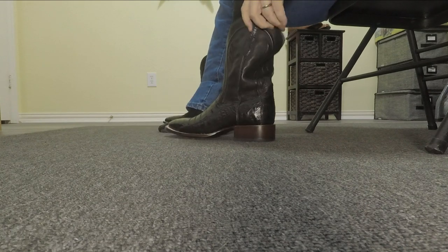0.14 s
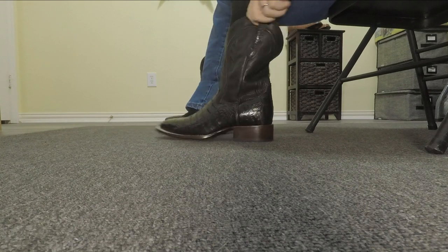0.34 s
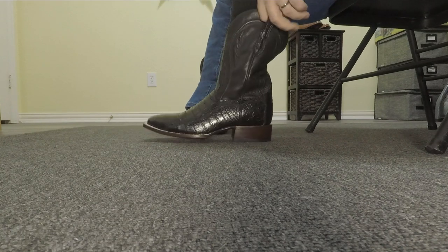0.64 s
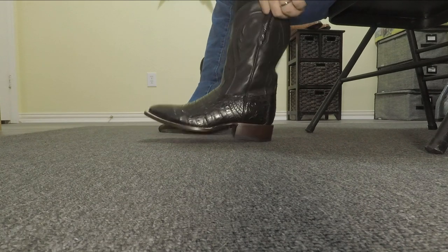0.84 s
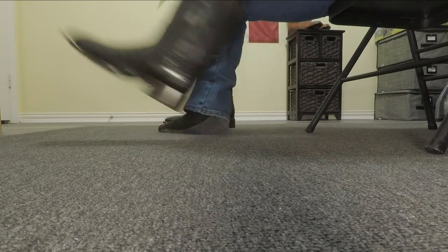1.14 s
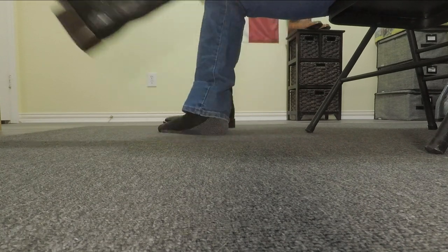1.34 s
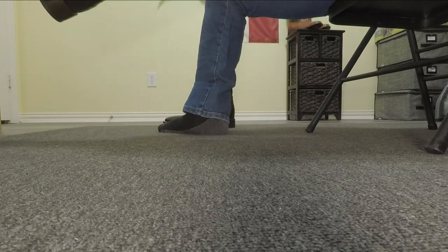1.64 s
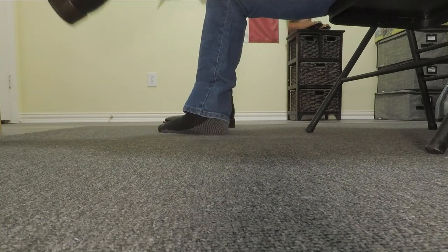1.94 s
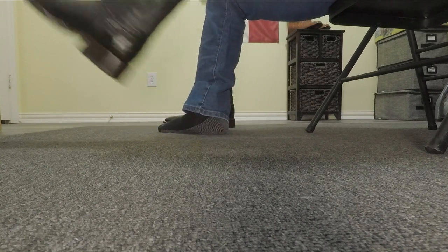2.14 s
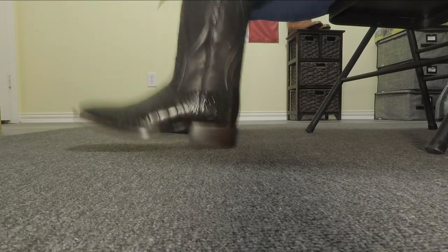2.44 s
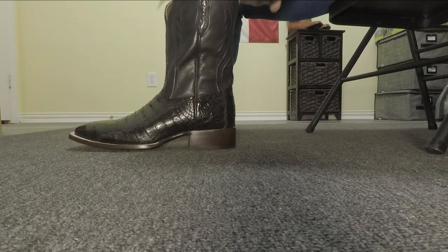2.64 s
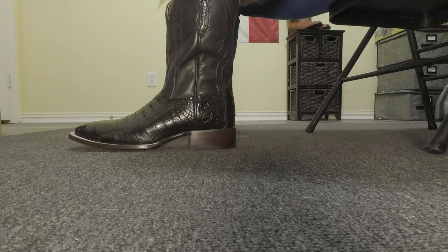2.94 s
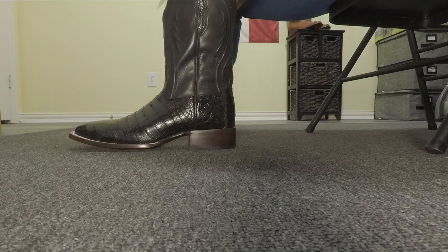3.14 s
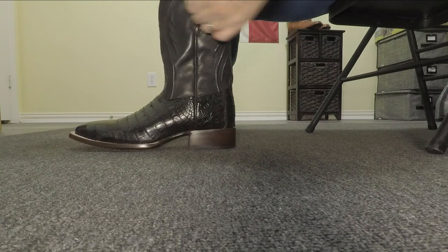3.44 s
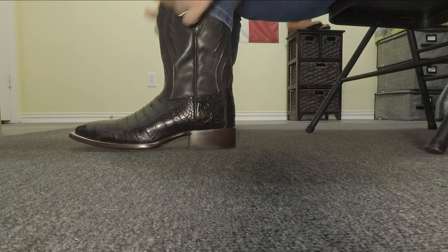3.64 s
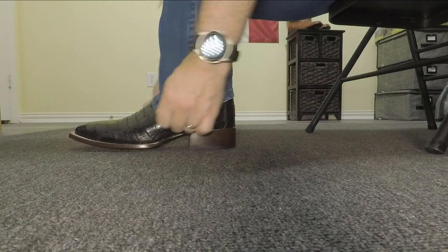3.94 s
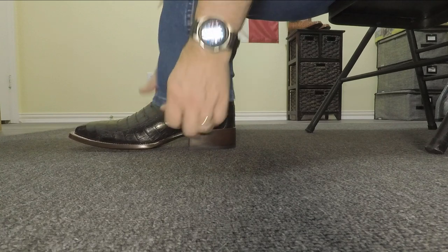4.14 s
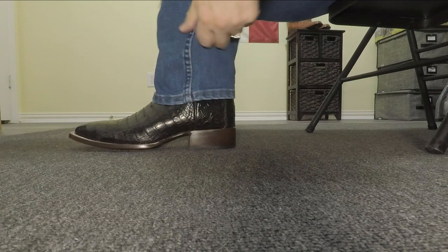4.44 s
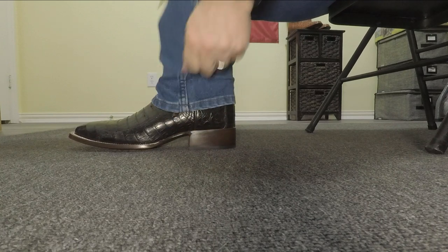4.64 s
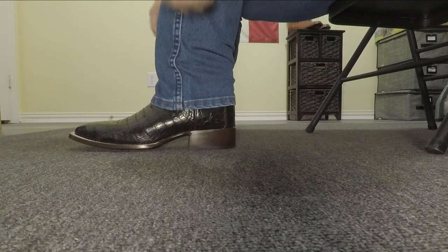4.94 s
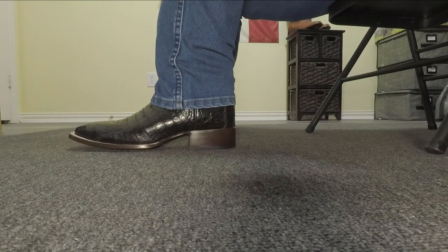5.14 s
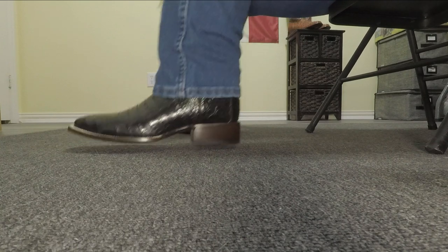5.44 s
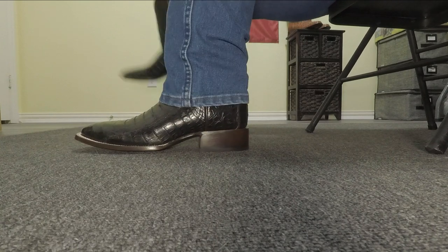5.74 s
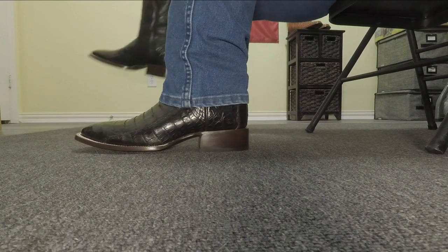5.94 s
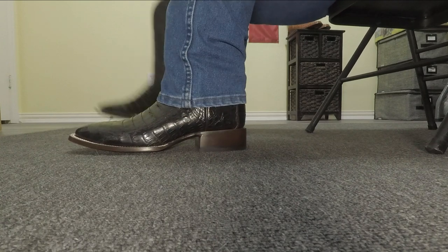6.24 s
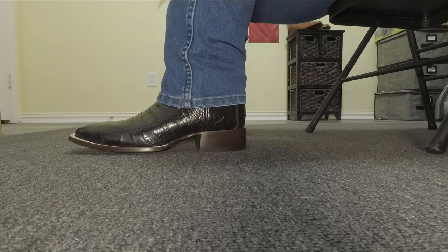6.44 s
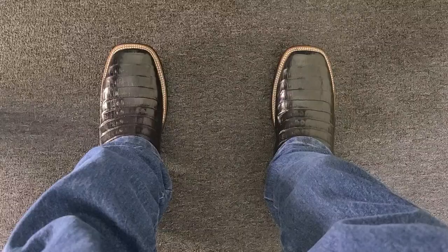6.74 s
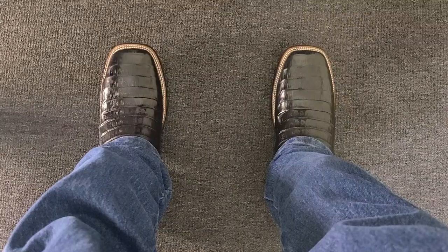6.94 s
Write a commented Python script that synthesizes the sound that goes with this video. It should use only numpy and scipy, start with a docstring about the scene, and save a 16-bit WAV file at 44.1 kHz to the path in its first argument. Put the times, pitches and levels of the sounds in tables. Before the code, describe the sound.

Low rubbing of leather and cloth comes in short uneven pulls, with folds puffing and an occasional dry tick. A boot stamps on carpet with clicky knocks and a short boxy room answer. Busy tugging and patting of jeans follows, then a pause, a sharp stamp and a duller set-down. A nearby stereo microphone on the floor hears it all before an abrupt stop.

```python
"""In a small quiet room, a microphone with two unlike ports stands on the floor by a seated person.
From the start a boot is pulled on: stick-slip noise rubs, folds of leather and denim puff, taut leather ticks.
At 2.5 s it stamps on the carpet, a click, knock, thud and ring; then the jeans are tugged down over the shaft.
At 5.6 s it stamps again and at 6.4 s the second boot is set down, each blow answered by the walls.
At 6.8 s all this stops abruptly and only a faint hush, there throughout, is left."""
import sys
import numpy as np
from scipy import signal
from scipy.fft import rfft, irfft, next_fast_len
from scipy.io import wavfile
from scipy.ndimage import map_coordinates

SR = 44100
rng = np.random.default_rng(int(sys.argv[2]) if len(sys.argv) > 2 else 0)


def put_to_file(sound):
    """Save the sound as 16-bit audio at rate SR, in the file named by the first command-line argument."""
    columns = np.atleast_2d(sound).T  # one column per channel
    safe = np.clip(columns, -1, 1)
    whole_steps = np.round(safe * 32767)
    wavfile.write(sys.argv[1], SR, whole_steps.astype(np.int16))


N = 313110  # samples

# Levels in the tables are those at the source, before trims, room and microphone.
# faint room noise: (frequency [Hz], relative density [dB])
AIR_SPECTRUM = [(60, -22.5), (110, -33.5), (160, 3.5), (260, 6), (420, -6), (620, -5.5), (930, -8.5),
                (1800, -17.5), (4400, -29.5), (7500, -23.5), (10000, -22.5), (15000, -41)]
# low rumble: (frequency [Hz], relative density [dB])
RUMBLE_SPECTRUM = [(20, -29), (42, -7), (57, 17), (72, -6.5), (100, 7.5), (160, -38)]
# hush that outlasts the rest: (frequency [Hz], relative density [dB])
HUSH_SPECTRUM = [(100, -4.5), (250, -6), (450, -10), (900, -22), (8000, -24)]
# pulls and tugs on boot and jeans: (start [s], hold [s], sliding [dB], leather flexing [dB], denim hiss [dB])
STROKES = [(0.0, 0.051, -34.5, -35, -56), (0.16, 0.12, -37.5, -39.5, -58.5), (0.383, 0.098, -36, -37, -58),
           (0.705, 0.014, -37.5, -39.5, -65), (0.816, 0.2, -35.5, -36.5, -56.5),
           (1.037, 0.29, -37.5, -55, -55), (1.411, 0.066, -38.5, -40, -62), (1.658, 0.049, -36, -38, -56),
           (1.792, 0.012, -23.5, -24.5, -44.5), (2.048, 0.053, -36.5, -37.5, -52.5),
           (2.25, 0.2, -38, -40, -62), (2.496, 0.062, -30, -25, -59.5), (3.14, 0.11, -41, -44, -62),
           (3.271, 0.049, -32, -38, -52), (3.391, 0.22, -37, -39.5, -55), (3.759, 0.072, -22.5, -31, -49.5),
           (3.826, 0.12, -20.5, -24.5, -49), (4.14, 0.026, -30, -35.5, -57),
           (4.386, 0.21, -31.5, -33.5, -56), (4.644, 0.031, -23.5, -28.5, -46.5),
           (4.798, 0.024, -29, -29, -49), (4.943, 0.15, -42, -42.5, -63), (5.34, 0.083, -40, -35.5, -60.5),
           (5.864, 0.34, -38.5, -41.5, -63), (6.533, 0.27, -47, -42.5, -64.5)]
# cloth and leather never lie quite still: (sliding [dB], flexing [dB], hiss [dB])
RESTING_DB = (-51, -50, -62.5)
# flexing shaft: (frequency [Hz], relative density [dB])
FLEX_SPECTRUM = [(70, -48), (115, -27.5), (150, -6), (205, -2), (290, -7), (400, -10.5), (600, -16.5),
                 (1200, -64.5), (5000, -90)]
# foot and cloth along the shaft: (frequency [Hz], relative density [dB])
SLIDE_SPECTRUM = [(200, -39), (340, 0), (480, 3.5), (600, -0.5), (720, 2), (900, -7.5), (1250, -16.5),
                  (1900, -25.5), (2700, -42.5), (3500, -30), (4600, -72.5), (9000, -42), (14000, -84)]
# denim weave: (frequency [Hz], relative density [dB])
DENIM_SPECTRUM = [(900, -15), (1800, 7.5), (2700, 6.5), (3500, 7.5), (4700, 3), (6000, 5.5), (7500, 4.5),
                  (10000, -2.5), (12500, -9), (13800, -14), (15000, -44)]
# a fold drags and rasps in one band:
# (start [s], time to its peak [s], pitch [Hz], glide [octaves], sharpness of each resonance [Q], level [dB])
SCUFFS = [(.02, 0.048, 830, 0.035, 1.8, -42), (.268, 0.011, 4500, 0, .7, -54.5),
          (0.271, 0.0053, 1180, -0.29, 2.1, -43), (.48, 0.019, 5490, 0.22, 1.2, -52.5),
          (1.2, 0.13, 733, -0.27, 4, -43.5), (1.773, 0.0096, 6300, -0.26, 0.93, -44),
          (1.774, .012, 700, -0.4, 1.5, -25), (2.019, 0.0064, 2820, -0.049, 3.6, -53),
          (2.246, 0.033, 1350, -0.0084, 4.2, -43.5), (2.262, 0.057, 663, -0.11, 4.5, -31.5),
          (3.363, .012, 1350, -0.78, 5, -44), (3.738, 0.021, 1500, 0.14, 2.3, -46),
          (3.738, 0.017, 7500, 0.065, 0.89, -51), (4.122, 0.014, 1900, -0.56, 0.78, -52.5),
          (4.314, 0.0061, 1150, 0.28, 2.2, -51), (4.336, 0.0089, 2330, -0.42, 2.3, -53),
          (4.426, 0.00604, 546, 0.67, 4, -21), (4.482, 0.0072, 1450, 0, 2.8, -46),
          (4.505, 0.0088, 1400, -0.26, 3, -41.5), (4.567, .005, 1400, 0, 4.2, -46),
          (5.26, 0.014, 616, 0.072, 5, -41), (5.33, .026, 632, -0.14, 5.3, -34),
          (5.882, 0.057, 3030, -0.38, 2.2, -57)]
# folds of leather and cloth snap over, hands pat the shaft:
# (time [s], fold level [dB], pitch [Hz], time to its peak [cycles], shaft air level [dB])
FLAPS = [(.033, -26, 710, .6, -52), (.264, -25.5, 730, 1.2, -27.5), (.283, -17.5, 315, 0.45, -16),
         (.319, -33, 293, 1.2, -30.5), (.417, -22.5, 438, 0.68, -23.5), (.679, -24, 424, 0.72, -21),
         (1.238, -30, 675, 1.8, -43), (1.560, -34, 500, 0.69, -39.5), (1.6015, -11.5, 500, 0.54, -15),
         (1.609, -18, 621, 1, -30.5), (1.630, -26, 753, 1.5, -43), (1.638, -21.5, 454, 0.83, -22),
         (1.697, -32.5, 605, 0.35, -40), (1.779, -16, 640, 1.5, -45), (1.800, -9.5, 327, 0.97, -16.5),
         (1.807, -14.5, 314.4, 1.7, -10), (2.093, -28.5, 600, 1, -46), (2.308, -32, 624, 1, -23.5),
         (2.364, -32, 629, 1.7, -43), (2.894, -28.5, 444, 0.33, -27), (3.452, -21.5, 502, 0.39, -17.5),
         (3.676, -27.5, 524, 1.1, -41.5), (3.788, -14.5, 612, 0.55, -40), (3.822, -8.5, 453, 0.5, -11.5),
         (3.873, -13, 431, 0.47, -16.5), (3.890, -14, 400, 0.44, -24), (3.966, -10, 393, 0.4, -26.5),
         (4.167, -21.5, 468, 1.1, -22), (4.313, -27.5, 533, 0.84, -42), (4.363, -24.5, 560, .9, -35),
         (4.436, -16, 335, 0.27, -19), (4.446, -18.5, 560, .55, -40.5), (4.585, -20, 580, 1.8, -47),
         (4.628, -24, 505, 1.5, -46.5), (4.672, -22.5, 557, 1.5, -33), (5.030, -35, 610, 1.1, -39),
         (5.866, -26.5, 480, 0.56, -28), (6.543, -31, 513, 0.84, -36.5), (6.629, -29, 573.4, 0.66, -41)]
# dry crackle of a fold: (frequency [Hz], relative level [dB])
CRACKLE_SPECTRUM = [(400, -21), (900, -6), (1800, 12), (2700, -8), (3500, -8), (5000, -27.5), (8000, -21),
                    (15000, -33.5)]
# ticks of taut leather, struck by the foot or a finger: (time [s], level [dB], pitch [Hz])
SNAPS = [(.284, -38, 1700), (1.6016, -32, 1900), (2.091, -39, 1300), (3.4524, -27.5, 3170),
         (3.458, -36, 3000), (4.317, -35, 1290), (4.340, -40, 2290), (4.436, -32, 1150)]
# heel and sole land on the carpet: (time [s], thud [dB], thud pitch [Hz], boot ring [dB], sole knock [dB],
# click [dB], click edge [Hz], grit against the click [dB], grit time constant [s], room [dB])
STAMPS = [(2.479, -6.5, 278, -26, -13.5, -8, 3700, -20, 0.0043, -2.5),
          (2.5227, -3.5, 211, -19.5, -6.5, -9, 2300, -16, .003, -3.5),
          (2.559, -20.5, 283, -35.5, -23.5, -38, 1500, -17.5, .003, 6.5),
          (5.592, -15.5, 167, -47, -22.5, -18, 2500, -15.5, 0.0033, 2),
          (5.598, -8, 213, -22, -15.5, -3.5, 2800, -28, 0.025, -2),
          (5.615, -20.5, 230, -44, -27, -29, 3900, -3.5, 0.0047, 9),
          (6.365, -4.5, 242, -39.5, -13.5, -19, 2300, -22, 0.039, -3),
          (6.373, -20, 232, -32.5, -20, -26.5, 1800, -10, 0.0091, 5.5),
          (6.4112, -19.5, 313, -42, -35, -47, 1800, -15.5, .005, -0.5)]
# modes of the boot standing on the floor: (frequency [Hz], level within the ring [dB], t60 [s])
BOOT_MODES = [(167, 10.5, 0.076), (231.3, 0.5, 0.23), (334.5, -0.5, 0.13)]
# heel click: (frequency [Hz], relative level [dB])
CLICK_SPECTRUM = [(300, 2), (750, 2), (1350, 3), (2100, -0.5), (2800, -6.5), (3550, -2), (4500, -15),
                  (9000, -14.5), (15000, -59)]
# all blows are thin in the bass, weakest around 100 Hz: (frequency [Hz], gain [dB])
BLOW_BASS = [(40, -13.5), (95, -25.0), (118, -25.5), (142, 1.0)]
# decay of the room: (frequency [Hz], t60 [s])
ROOM_DECAY = [(120, 0.07), (250, 0.41), (600, 0.81), (2000, 0.51), (5000, 0.625), (12000, 0.38)]
# standing waves between the walls: (frequency [Hz], width [Hz], level against the direct sound [dB])
STANDING = [(167, 7, -7), (206.4, 5.3, -5), (318.6, 9.4, -5), (341.5, 12, -6.5), (479.4, 16, -6.5),
            (512.9, 3.2, -2.5), (578.5, 7.4, 2), (613.4, 7.8, 4.5), (703.5, 16, -5)]
# likeness of the two ports: (frequency [Hz], correlation of left and right before colouring [0-1])
ALIKE = [(100, .98), (500, .98), (1300, .92), (2000, .74), (2800, .36), (3600, .59), (5000, .18),
         (7500, .81), (13000, .73)]
# the left port against the right: (frequency [Hz], level [dB], phase lead [rad])
PORTS = [(80, -.9, 0), (250, -2, -.15), (420, -4.5, -.3), (560, -9, -.35), (690, -16, .6), (800, -9, 1.7),
         (1000, -2.7, 1.9), (1500, -1.7, 1.85), (2300, 0, 1.3), (3100, -3, 0), (4400, -4, 0), (5400, -8, 0),
         (9000, -6, 0), (14000, -3, 0)]

RUMBLE_REST_DB, RUMBLE_FLEX_DB = -91, -37  # always there; against the flexing
SHAKE_S, SHAKE_DB, SHAKE_T60_S = 2.47, -45.5, 4.8  # rumble that lingers after the first hard stamp
# time constants; a long pull builds up more slowly, by a share of its hold
ATTACK_S, ATTACK_SHARE, RELEASE_S = 0.046, 0.071, 0.078
GRIP_DB, GRIP_RATE = 1.22, 30  # the grip catches and lets go: depth, knots a second
GLIDE_PEAKS = 1.6  # time constant of a fold's glide, in times to its peak
WANDER_OCTAVES, WANDER_RATE = 0.054, 45  # its tension wavers: depth, knots a second
SHAFT_HZ, SHAFT_DB = 213, -9  # the air in the shaft answers every fold: pitch, level against a crease
CRACKLE_DB = -26  # peak, against the level of its fold
# small creases give way at random; level over the sliding
CREASES_PER_S, CREASE_DB, CREASE_SPREAD_DB, CREASE_HZ = 5.6, -6.5, 1.5, 445
SPRAY_DB, SPRAY_S = -14.5, 0.0022  # finer ticks trail each snap: level against it, time constant
GIVE_S = 0.02  # lead-in where the thud may swell before the landing
THUD_LAG_S = 0.00081  # the floor answers just after the click
CLICK_ROOM_DB = -4  # the click reaches the walls less than the thud
STOP_S = 6.803
TOP_HZ = 15200  # nothing is heard from here up


def amp(db):
    """Decibels to amplitude."""
    return 10 ** (np.asarray(db) / 20)


def unit(x):
    """Scale x to rms 1."""
    return x / np.sqrt(np.mean(x ** 2) + 1e-20)


def along(points, hz):
    """Read (frequency [Hz], value) points on a log frequency axis."""
    f, v = np.transpose(points)
    return np.interp(np.log(hz + 1), np.log(f + 1), v)


def noise(size=N):
    """Two unrelated white noises: the mid and the side of a scattered sound."""
    return rng.standard_normal((2, size))


def wobble(rate, size=N):
    """A smooth random curve, rate knots a second."""
    knots = rng.standard_normal(int(size * rate / SR) + 4)
    return map_coordinates(knots, [np.arange(size) * rate / SR])


def filtered(x, response):
    """Multiply the spectrum of x by a response of frequency."""
    m = next_fast_len(N + SR // 2)
    return irfft(rfft(x, m) * response(np.fft.rfftfreq(m, 1 / SR)), m)[..., :N]


def impulse(spectrum, size=4096):
    """The causal minimum-phase impulse response that has this spectrum, peak 1."""
    cepstrum = irfft(np.log(amp(along(spectrum, np.fft.rfftfreq(size, 1 / SR)))))
    # fold the cepstrum forward in time
    cepstrum[1:size // 2] *= 2
    cepstrum[size // 2 + 1:] = 0
    h = irfft(np.exp(rfft(cepstrum)))
    return h / np.abs(h).max()


def coloured(x, spectrum):
    """Each row of x rung through a spectrum, overall rms 1."""
    return unit(signal.fftconvolve(x, impulse(spectrum)[None], axes=1)[:, :N])


def add(track, s, x):
    """Mix x into the track from time s."""
    part = track[:, round(s * SR):][:, :x.shape[1]]
    part += x[:, :part.shape[1]]


def slips(rate, spread_db, smooth, size=N):
    """Friction: tiny stick-slip jerks of uneven size, rate a second, over a smooth rub."""
    strikes = rng.random(size) < rate / SR
    jerks = strikes * noise(size) * amp(spread_db * rng.standard_normal(size))
    return unit(jerks) + smooth * noise(size)


def push(t, hz, cycles):
    """A soft blow: pressure swings up to a peak after so many cycles and dies away."""
    u = t * hz / cycles
    return u * np.exp(1 - u) * np.sin(2 * np.pi * hz * t)


def in_room(x, wet_db, delay=0.004004, near=0.21, near_s=0.0037):
    """Mid and side of a short sound and the walls' answer, each frequency dying at its own speed."""
    hz, t, z = signal.stft(rng.standard_normal((2, SR * 3 // 4)), SR, nperseg=256)
    # dull first echoes off legs and chair
    early = 1 + near * np.exp(-t / near_s) / (1 + (hz[:, None] / 1000) ** 2)
    decay = amp(-60 * t / along(ROOM_DECAY, hz)[:, None])
    tail = signal.istft(z * early * decay, SR, nperseg=256)[1]
    tail = amp(wet_db) * tail / np.linalg.norm(tail[0])
    # the delay is a path about 1.4 m longer than the direct one
    response = np.pad(tail, ((0, 0), (round(delay * SR), 0)))
    response[0, 0] = 1  # the direct sound comes from straight ahead
    return signal.fftconvolve(x[None], response, axes=1)


def background(flexing):
    """Faint room noise, and a low rumble that swells with the flexing and lingers after a stamp."""
    since = np.arange(N) / SR - SHAKE_S
    shake = (since > 0) * amp(SHAKE_DB - 60 * np.abs(since) / SHAKE_T60_S)
    rumble = amp(RUMBLE_REST_DB) + amp(RUMBLE_FLEX_DB) * flexing + shake
    return amp(-48.0) * coloured(noise(), AIR_SPECTRUM) + rumble * coloured(noise(), RUMBLE_SPECTRUM)


def effort():
    """Strength of sliding, flexing and hiss: each stroke builds up, holds and dies away; powers add."""
    t = np.arange(N) / SR
    power = amp(RESTING_DB)[:, None] ** 2 * np.ones(N)
    for s, hold, *levels_db in STROKES:
        before = np.maximum(s - t, 0) / (ATTACK_S + ATTACK_SHARE * hold)
        after = np.maximum(t - s - hold, 0) / RELEASE_S
        power += (amp(levels_db)[:, None] * np.exp(-before - after)) ** 2
    return np.sqrt(power)


def rubbing(sliding, flexing, hissing):
    """The shaft flexes, foot and cloth slip and stick along it, and the denim weave hisses."""
    grip_db = GRIP_DB * wobble(GRIP_RATE)
    bends = coloured(slips(rate=750, spread_db=-0.5, smooth=0.55), FLEX_SPECTRUM)
    slides = coloured(slips(rate=2000, spread_db=3.0, smooth=1.0), SLIDE_SPECTRUM)
    weave = coloured(slips(rate=10000, spread_db=0.5, smooth=2.8), DENIM_SPECTRUM)
    flex = flexing * amp(grip_db - 1.5) * bends
    slide = sliding * amp(grip_db - 2.0) * slides
    hiss = hissing * amp(0.93 * grip_db + 0.5) * weave
    return flex + slide + hiss


def scuffs():
    """Grainy friction swells and fades through the resonance of one taut fold, which moves with its tension."""
    t, track = np.arange(SR // 2) / SR, np.zeros((2, N))
    for s, rise, hz, glide, sharpness, db in SCUFFS:
        b, a = signal.iirpeak(hz, sharpness, SR)
        grains = slips(rate=330, spread_db=2.0, smooth=0.9, size=SR)
        rasp = unit(signal.lfilter(b, a, signal.lfilter(b, a, grains)))
        octaves = glide * (1 - np.exp(-t / (GLIDE_PEAKS * rise)))
        octaves += WANDER_OCTAVES * wobble(WANDER_RATE, size=len(t))
        # reading the rasp faster or slower moves its pitch
        position = np.cumsum(2 ** octaves)
        moving = np.array([map_coordinates(row, [position], order=3) for row in rasp])
        add(track, s, amp(db) * t / rise * np.exp(1 - t / rise) * moving)
    return track


def creases(sliding, cycles=0.37):
    """Random small folds, as strong as the sliding that sets them off: rows like those of FLAPS."""
    times = np.flatnonzero(rng.random(N) < CREASES_PER_S / SR)
    size, pitch = rng.standard_normal((N, 2))[times].T
    level_db = 20 * np.log10(sliding[times]) + CREASE_DB + CREASE_SPREAD_DB * size
    pitch_hz = CREASE_HZ * np.exp(0.3 * pitch)
    return [(s, db, hz, cycles, db + SHAFT_DB) for s, db, hz in zip(times / SR, level_db, pitch_hz)]


def flaps(folds):
    """Each fold pushes the air, with a hollow puff of the shaft and a faint dry crackle."""
    track, tick = np.zeros((2, N)), impulse(CRACKLE_SPECTRUM)
    t = np.arange(len(tick)) / SR
    for s, db, hz, cycles, shaft_db in folds:
        burst = rng.standard_normal(len(t)) * np.exp(-t / 0.00075)
        crackle = signal.fftconvolve(burst, tick)[:len(t)]
        fold = push(t, hz, cycles) + amp(CRACKLE_DB) * crackle / np.abs(crackle).max()
        puff = push(t, SHAFT_HZ, cycles=0.42)
        add(track, s, in_room(amp(db) * fold + amp(shaft_db) * puff, wet_db=-4))
    return track


def snaps():
    """Taut leather gives one crisp tick and a brief spray of finer ones."""
    track, t = np.zeros((2, N)), np.arange(SR // 20) / SR
    for s, db, hz in SNAPS:
        spray = amp(SPRAY_DB) * rng.standard_normal(len(t)) * np.exp(-t / SPRAY_S)
        contacts = (t == 0) + spray
        tick = signal.fftconvolve(contacts, push(t, hz, cycles=0.45))[:len(t)]
        add(track, s, in_room(amp(db) * tick, wet_db=-6.5))
    return track


def boot_ring(t):
    """The standing boot rings in a few decaying modes, each blow exciting them a little differently."""
    ring = np.zeros(len(t))
    for hz, db, t60 in BOOT_MODES:
        ring += amp(db + rng.normal(0, 1) - 60 * t / t60) * np.sin(2 * np.pi * hz * t)
    return ring * (1 - np.exp(-t / 0.005))


def stamps():
    """The heel clicks through the carpet and grinds on its pile, sole knocks, floor thuds, boot rings."""
    track, click = np.zeros((2, N)), impulse(CLICK_SPECTRUM, size=8192)
    t = np.arange(len(click)) / SR
    for s, thud_db, hz, ring_db, knock_db, click_db, edge_hz, grit_db, grit_s, room_db in STAMPS:
        thud = amp(thud_db) * push(t, hz, cycles=0.5)
        ring = amp(ring_db) * boot_ring(t)
        knock = amp(knock_db) * push(t, hz=353, cycles=0.43)
        # a higher thud carries less bass
        low_cut = signal.butter(4, 0.55 * hz, "high", fs=SR, output="sos")
        # filtered both ways, the body starts to swell as the carpet gives way
        body = signal.sosfiltfilt(low_cut, np.pad(thud + ring + knock, (round(GIVE_S * SR), 0)))
        grains = amp(grit_db) * rng.standard_normal(len(t)) * np.exp(-t / grit_s)
        grit = signal.fftconvolve(grains, click / np.linalg.norm(click))[:len(t)]
        # each landing has its own click edge; a lower edge sounds duller
        edged = signal.lfilter(*signal.butter(3, edge_hz, fs=SR), click + grit)
        add(track, s - GIVE_S + THUD_LAG_S, in_room(body, wet_db=room_db))
        add(track, s, in_room(amp(click_db) * edged, wet_db=room_db + CLICK_ROOM_DB))
    return track


def standing_waves(x):
    """The room's resonances colour everything that sounds in it."""
    def response(f):
        gain = 1
        for centre, width, db in STANDING:
            gain = gain + amp(db) * 1j * f * width / (centre ** 2 - f ** 2 + 1j * f * width)
        return amp(-1.5) * gain
    return filtered(x, response)


def hush():
    """A faint dull noise that stays when all else has stopped."""
    return amp(-77.5) * coloured(noise(), HUSH_SPECTRUM)


def spread(pair):
    """Mid and side to left and right: the less alike the ports hear a frequency, the more side it gets."""
    def weights(hz):
        turn = np.arccos(np.clip(along(ALIKE, hz), 0, 1)) / 2
        return np.array([np.cos(turn), np.sin(turn)])
    mid, side = filtered(pair, weights)
    return np.array([mid + side, mid - side])


def scene():
    """Rubbing, blows and room, until everything drops to a faint hush."""
    sliding, flexing, hissing = effort()
    steady = background(flexing) + rubbing(sliding, flexing, hissing) + scuffs()
    blows = flaps(FLAPS + creases(sliding)) + snaps() + stamps()
    blows = filtered(blows, lambda hz: amp(along(BLOW_BASS, hz)))
    # a 1.5 ms fade ends the sound
    sounding = np.clip((STOP_S - np.arange(N) / SR) / 0.0015, 0, 1)
    return spread(standing_waves(steady + blows) * sounding + hush())


def record(dry):
    """Of the ports, the left is hollow near 700 Hz, lags slightly below 600 Hz and leads from there to 3 kHz."""
    f, level_db, lead = np.transpose(PORTS)

    def port_gains(hz):
        left = amp(along(np.c_[f, level_db], hz)) * np.exp(1j * along(np.c_[f, lead], hz))
        return 2 * np.array([left, np.ones(len(hz))]) / (1 + left)  # the mean of both stays 1
    heard = filtered(dry, port_gains)
    # the loudest peaks round off just under full scale
    heard = heard / (1 + (heard / 0.95) ** 8) ** (1 / 8)
    return filtered(heard, lambda hz: hz < TOP_HZ)


dry = scene()
out = record(dry)
put_to_file(out)
```